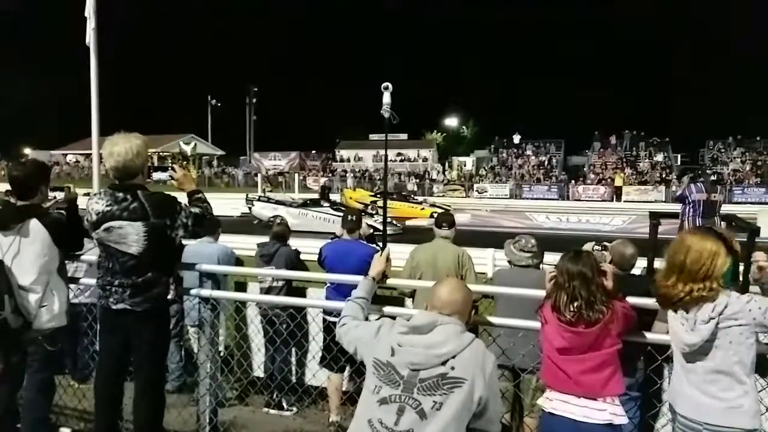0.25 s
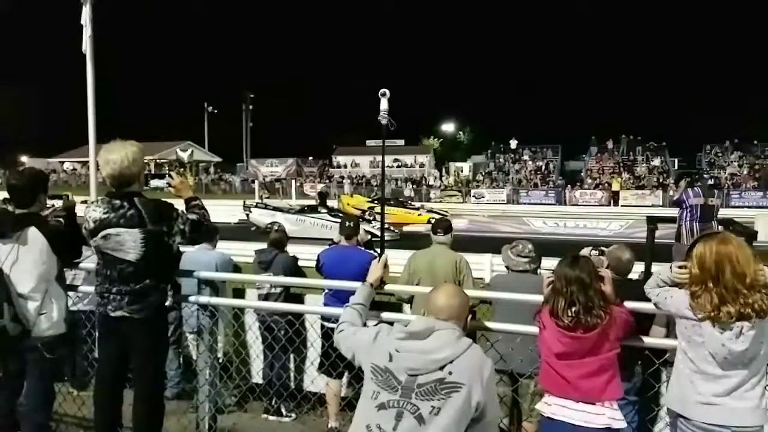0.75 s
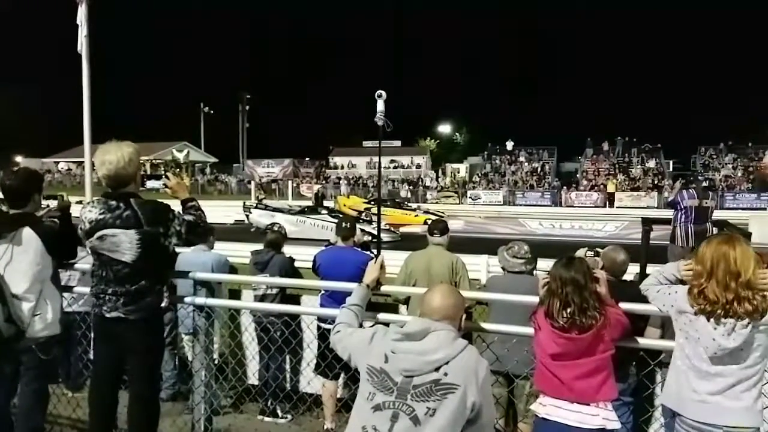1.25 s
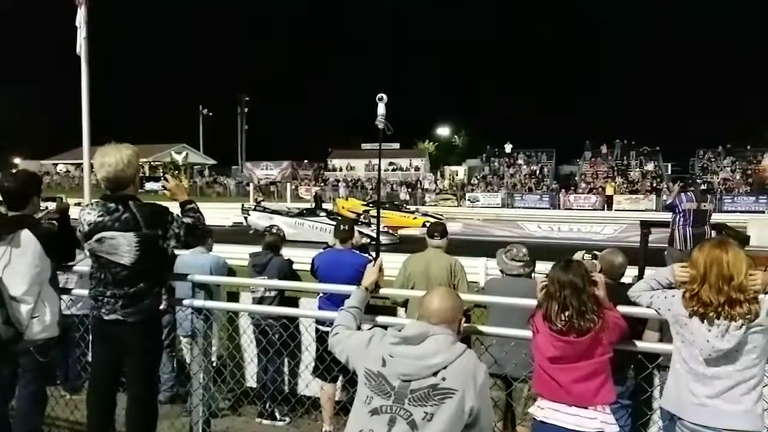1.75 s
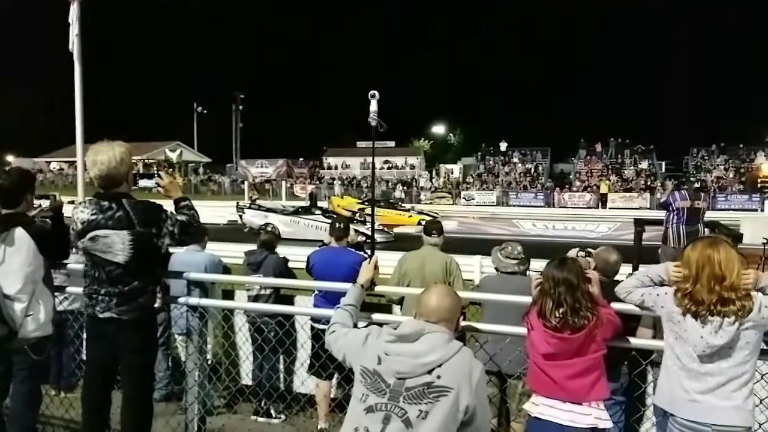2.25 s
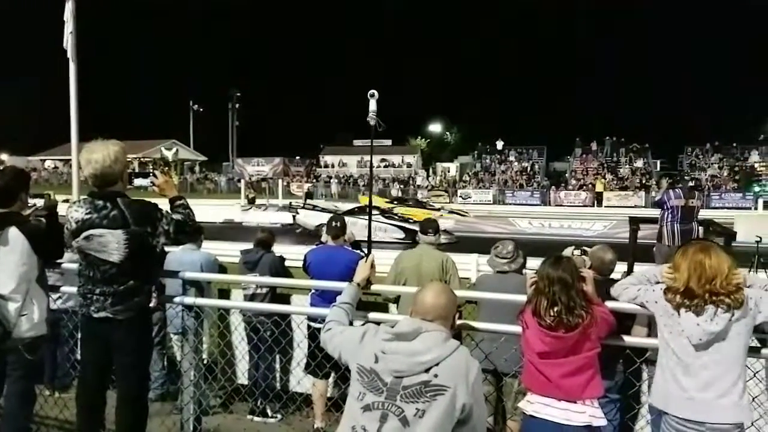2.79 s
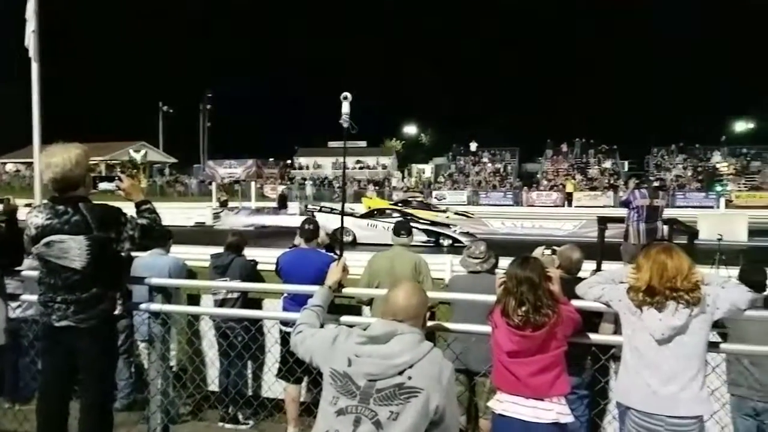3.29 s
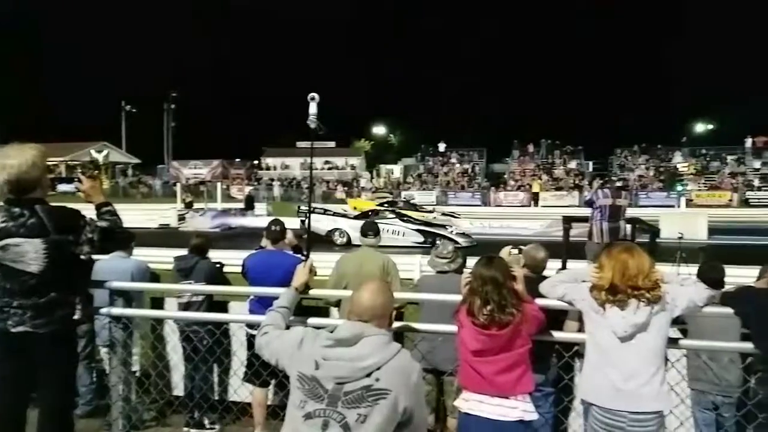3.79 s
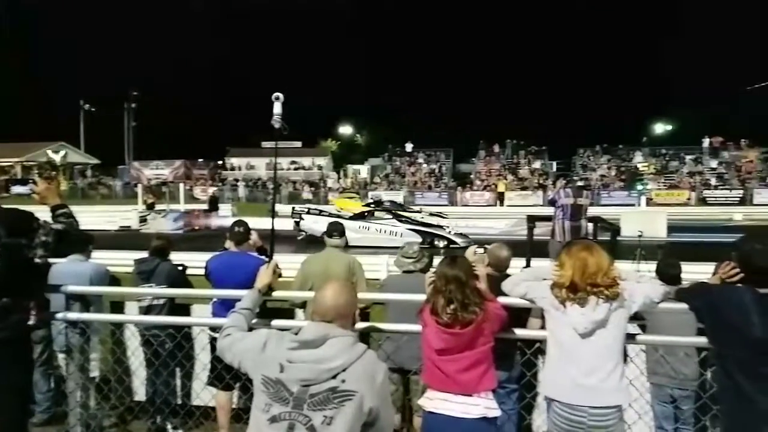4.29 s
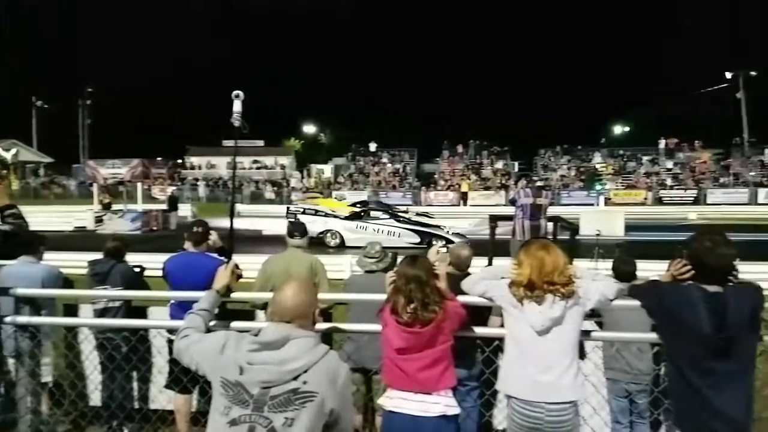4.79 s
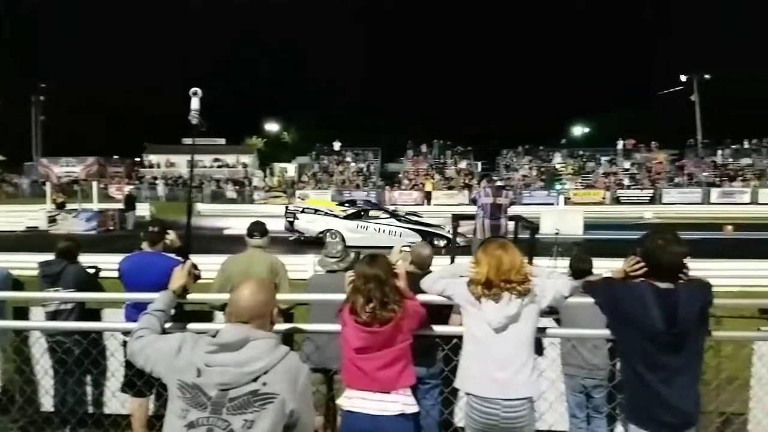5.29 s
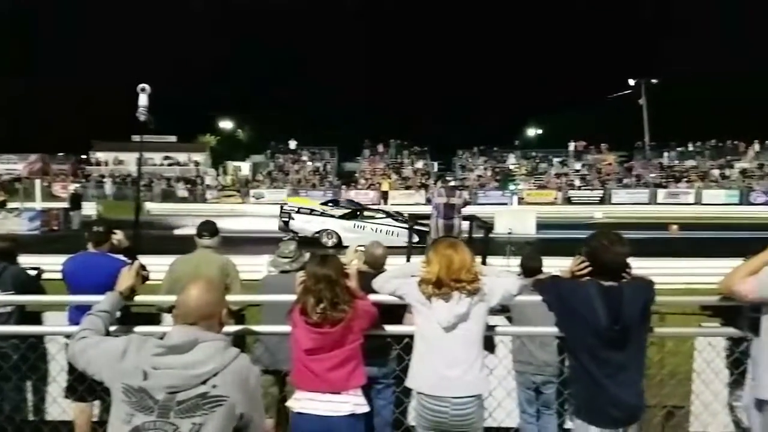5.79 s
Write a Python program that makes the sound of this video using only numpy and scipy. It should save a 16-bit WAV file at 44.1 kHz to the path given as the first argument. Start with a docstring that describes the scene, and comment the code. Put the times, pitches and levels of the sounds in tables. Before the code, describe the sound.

Loud jet engine exhaust heard from behind a spectators' fence, wide and rough in stereo, with bright hiss on top and barely audible whining tones. The roar thickens when a flame ignites midway, then abruptly loses its treble and much of its level, as if the phone microphone were overwhelmed. A muffled low throb and slow buffeting continue to the end, with isolated ticks on the right.

```python
"""Behind the spectators' fence of a drag strip, two jet cars hold their turbines at a loud idle on the line.
Turbulent exhaust, made as shaped noise, roars and throbs under a hiss, with faint tones at shaft multiples.
At 2.5 s an afterburner lights: a second shaped noise grows and the roar swells.
Just after 3 s the sound abruptly goes dull, as if the microphones had choked: a pulsing rumble stays,
with a few pointed ticks on the right."""
import sys
import numpy as np
from scipy import signal
from scipy.fft import rfft, irfft
from scipy.io import wavfile
from scipy.ndimage import uniform_filter1d

SR = 44100
rng = np.random.default_rng(int(sys.argv[2]) if len(sys.argv) > 2 else 0)


def dump(signal):
    """Clip the signal to [-1, 1] and save it as 16-bit WAV at the path in sys.argv[1]."""
    limited = np.clip(np.atleast_2d(signal).T, -1, 1)
    pcm = np.round(limited * 32767).astype(np.int16)
    wavfile.write(sys.argv[1], SR, pcm)


N = 266805
TIME = np.arange(N) / SR  # s
FREQ = np.maximum(np.arange(N // 2 + 1) * SR / N, 1)  # Hz, kept above zero for the logarithm
CHOKE_S = 3.0125  # moment at which the sound goes dull


def jets():
    """Jet noise: turbulent mixing radiates broadband sound; large eddies throb, small ones rush, the finest hiss."""
    # spectrum of the idling exhaust: (frequency [Hz], relative density [dB per Hz])
    idle_spectrum = [(20, -67), (50, -60.5), (100, -41), (160, -38), (290, -44), (370, -49), (510, -49),
                     (610, -46), (850, -49.5), (1600, -48.5), (2100, -50.5), (2500, -56.5), (5000, -60.5),
                     (14400, -63)]
    # spectrum of the afterburner flame: (frequency [Hz], relative density [dB per Hz])
    flame_spectrum = [(20, -63), (60, -49.5), (140, -38), (290, -42), (440, -46), (590, -41), (900, -46.5),
                      (1600, -42.5), (2100, -48.5), (2600, -53.5), (4500, -59.5), (7000, -63), (9300, -68),
                      (12500, -61)]
    # colour of the two microphone ports: (frequency [Hz], left gain [dB], right gain [dB])
    port_colour = [(887, -3, -3.5), (1417, -4, -2), (2240, -1, -2), (2810, 0.6, -3.5), (3100, 1.8, 1.5),
                   (4200, 1.0, -4), (4680, 0, -5), (6010, 2.5, -0.5), (7280, 10.5, -3), (9100, -8.5, -5.5),
                   (9440, 2.8, -1), (10500, 5, -7), (12040, 0.8, 4), (12850, 5, -5.5)]
    # likeness of the roar at the two ports: (frequency [Hz], shared part of the power [0-1])
    port_likeness = [(60, 0.97), (140, 0.98), (290, 0.91), (640, 0.8), (1400, 0.41), (3000, 0.13),
                     (7000, 0.1)]
    # level of the throb: (time [s], level [dB])
    throb_course = [(0, -19.2), (.35, -18.6), (.8, -19.5), (1.03, -17), (1.65, -17.5), (1.95, -19.5),
                    (2.25, -17), (3.0, -19)]
    spool_start_db, spool_s = -1.2, 0.61  # the idle starts lower and comes up in this time
    pilot_db, flame_db = -22.5, -.5  # flame gain before lighting and when fully lit
    idle_yield_db = -8  # change of the idling exhaust in the mixture once the flame is lit
    idle_rush_db, rush_rise_db = -16, 3.5  # rush at idle, and its rise under the afterburner

    lit = afterburner()
    spool_db = spool_start_db * np.maximum(1 - TIME / spool_s, 0)
    idle_db = spool_db + idle_yield_db * lit ** 4
    flame_gain = undb(pilot_db) * (1 - lit) + undb(flame_db) * lit
    likeness = spectrum(port_likeness)

    idle = turbulence(spectrum(idle_spectrum), likeness, lag_ms=0.08)
    flame = turbulence(spectrum(flame_spectrum), likeness, lag_ms=0.17)
    flame = panned(flame, db=-5.0)
    exhaust = idle * undb(idle_db) + flame * flame_gain
    roar = filtered(exhaust, undb(spectrum(port_colour)))
    tones = turbine() * undb(idle_db)
    throb, rush, hiss = eddies(roar + tones, large_hz=372, small_hz=2400)

    throb_db, = curves(throb_course)
    throb = swell(throb, throb_db, hold_s=0.11)
    rush_db = idle_rush_db + spool_db + rush_rise_db * lit
    rush = swell(rush, rush_db + .2 * walk(9), hold_s=0.1)
    # the finest eddies come in quick spurts
    hiss = hiss * undb(0.35 * walk(12) + .4 * walk(220))
    return throb + rush + hiss


def afterburner():
    """Logistic growth of a flame, from 0 at idle to 1 when fully lit."""
    half_grown_s, growth_s = 2.555, 0.058  # moment of half growth, time constant
    return .5 + .5 * np.tanh((TIME - half_grown_s) / (2 * growth_s))


def turbine(wander=.0009, flutter_db=6.0, tone_db=-1.5):
    """Harmonics of rotation: tones on multiples of a nearly steady shaft rate; hot air makes each fade in and out."""
    # turbine tones: (multiple of the shaft rate [1], relative level [dB], left minus right [dB])
    blade_tones = [(1, -33, 0), (2, -33, 2), (10, -43, 2), (12, -44, 1), (14, -48, 2), (17, -48, 9),
                   (21, -45, 4), (23, -48, 12), (31, -46, 10)]
    shaft_hz = 301.2
    turns = np.cumsum(shaft_hz * (1 + wander * walk(7.7))) / SR
    out = np.zeros((2, N))
    for multiple, db, pan_db in blade_tones:
        start = rng.random((2, 1))  # in turns, drawn for each side
        phase = 2 * np.pi * (multiple * turns + start) + 1.5 * walk(15.25)
        gain = undb(db + tone_db + flutter_db * walk(14))
        out += panned(gain * np.sin(phase), pan_db)
    return out


def muffled_roar():
    """Low-pass filtering of jet noise: the treble goes; slow buffeting, a throb near 200 Hz and a weak rush stay."""
    # spectrum of the muffled roar: (frequency [Hz], left relative density, right relative density [dB per Hz])
    dull_spectrum = [(12, -56.5, -51), (35, -40.5, -47), (127, -55.5, -48), (204.7, -52.5, -43),
                     (297, -56, -54), (520, -64.5, -64.5), (730, -68, -64), (907, -60.5, -68.5),
                     (1020, -70.5, -75.5), (1190, -78, -75.5), (1420, -67.5, -63.5), (1820, -70, -74),
                     (2213, -72, -75), (2730, -83.5, -91)]
    # level of the muffled throb: (time [s], level [dB])
    dull_throb_course = [(3.05, -26.5), (4.1, -24.5), (4.75, -25), (5.05, -26), (6.03, -26.5)]
    buffet_start_db, ebb_db_per_s = -28, 1  # the buffeting ebbs from this level
    rush_db, dull_hz = -33, 2500  # level of the rush, upper limit of the sound

    roar = turbulence(spectrum(dull_spectrum), likeness=0.28, lag_ms=1.122)
    buffet, throb, rush = eddies(roar, large_hz=78, small_hz=375)
    buffet_db = buffet_start_db - ebb_db_per_s * (TIME - CHOKE_S)
    buffet = swell(panned(buffet, db=-4.5), buffet_db, hold_s=.18)
    throb_db, = curves(dull_throb_course)
    throb = swell(panned(throb, db=0.8), throb_db, hold_s=.08)
    rush = swell(rush, rush_db + 0.45 * walk(6.3), hold_s=.2)
    return filtered(buffet + throb + rush, below(dull_hz, order=300))


def ticks():
    """Impulses: brief pointed notches of pressure, wide in spectrum, in the right channel alone."""
    # ticks: (time [s], depth before the final low-pass [dB], half-width at a quarter of the depth [ms])
    tick_list = [(4.5902, -14.5, 0.12), (4.8325, -17, 0.11), (5.179, -3.5, 0.054), (5.2881, -17, 0.1)]
    right = np.zeros(N)
    for s, db, ms in tick_list:
        offset = (TIME - s) * 10 ** 3 / ms
        right -= undb(db) / (1 + offset ** 2) ** 2
    return np.array([np.zeros(N), right])


def turbulence(db, likeness, lag_ms):
    """Partial coherence: random pressure of a given density at two ports, the shared part later at the right."""
    shared, *own = rfft(rng.standard_normal((3, N)))
    likeness = np.clip(likeness, 0, 1)
    lag_s = np.array([[0], [lag_ms / 10 ** 3]])
    arrival = np.exp(-2j * np.pi * FREQ * lag_s)
    # the powers of the shared and own parts add up to one
    pair = np.sqrt(likeness) * shared * arrival + np.sqrt(1 - likeness) * np.array(own)
    return irfft(pair * undb(db) * np.sqrt(SR / 2), N)


def eddies(x, large_hz, small_hz):
    """Eddy size sets pitch: split a roar into low, middle and high parts that add up to it."""
    low, high = below(large_hz, order=12), 1 - below(small_hz, order=12)
    return filtered(x, low), filtered(x, 1 - low - high), filtered(x, high)


def swell(x, db, hold_s):
    """Envelope control by short-time power: follow a level curve; flutter faster than hold_s stays its own."""
    size = max(int(hold_s * SR), 1)
    power = uniform_filter1d(uniform_filter1d(np.mean(x ** 2, axis=0), size), size)
    return x * undb(db) / np.sqrt(np.abs(power) + 1e-12)


def walk(rate):
    """Band-limited random modulation: levels held 1 / rate s and smoothed twice; spread near 1."""
    k = max(int(SR / rate), 1)
    steps = rng.standard_normal(N)[np.arange(N) // k]
    return 1.3 * uniform_filter1d(uniform_filter1d(steps, k), k)


def panned(x, db):
    """Interaural level difference: make the left side louder than the right by db."""
    return x * undb(np.array([[1], [-1]]) * db / 2)


def filtered(x, gain):
    """Linear filtering: multiply the spectrum by a gain per frequency."""
    return irfft(rfft(x) * gain, N)


def below(hz, order):
    """Low-pass gain, one half at hz; one minus it is the matching high-pass."""
    ratio = np.minimum(FREQ / hz, 2 ** (40 / order))  # bounded so that the power cannot overflow
    return 1 / (1 + ratio ** order)


def spectrum(table):
    """Logarithmic pitch scale: columns of a table joined by straight lines in log frequency."""
    hz, *columns = np.transpose(table)
    return np.array([np.interp(np.log(FREQ), np.log(hz), c) for c in columns])


def curves(table):
    """Piecewise-linear envelopes: columns of a table joined by straight lines in time."""
    s, *columns = np.transpose(table)
    return [np.interp(TIME, s, c) for c in columns]


def undb(db):
    """Logarithmic level law: decibels to amplitude gain."""
    return 10 ** (np.asarray(db) / 20)


def scene(drop_db=-14, fade_s=0.016, return_s=0.014):
    """Superposition: the open roar drops at once and dies away, the muffled one takes its place, ticks add."""
    since = np.maximum(TIME - CHOKE_S, 0)
    fade = undb(drop_db) * np.exp(-(since / fade_s) ** 2)
    open_gain = np.where(since > 0, fade, 1)
    dull_gain = 1 - np.exp(-since / return_s)
    return jets() * open_gain + muffled_roar() * dull_gain + ticks()


def record(dry):
    """Saturation and band limit: the phone clips peaks at full scale and cuts the top."""
    top_hz = 14520
    low_pass = signal.ellip(14, .1, 80, top_hz, fs=SR, output="sos")  # ripple and stop-band in dB
    return signal.sosfilt(low_pass, np.clip(dry, -1, 1))


dry = scene()
out = record(dry)
dump(out)
```